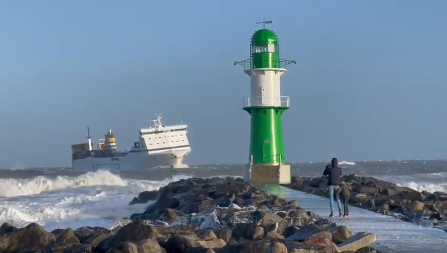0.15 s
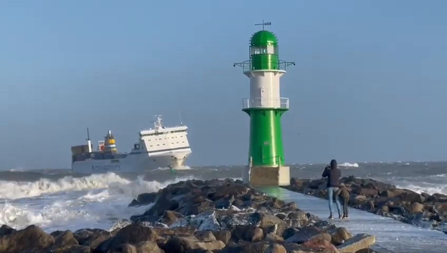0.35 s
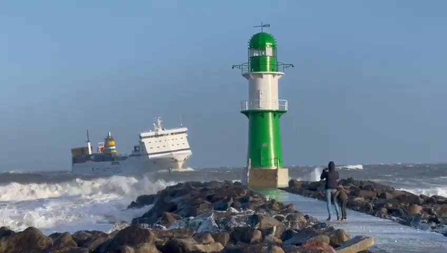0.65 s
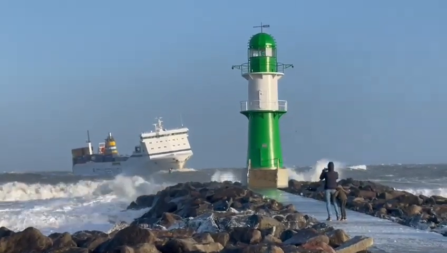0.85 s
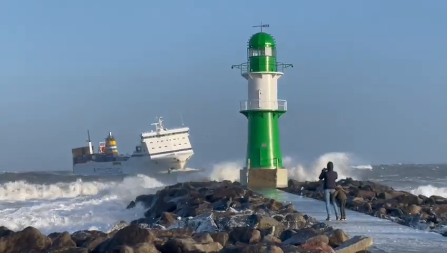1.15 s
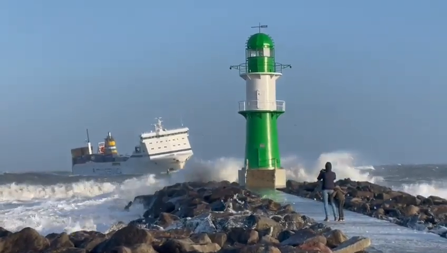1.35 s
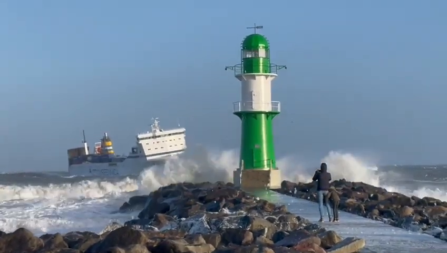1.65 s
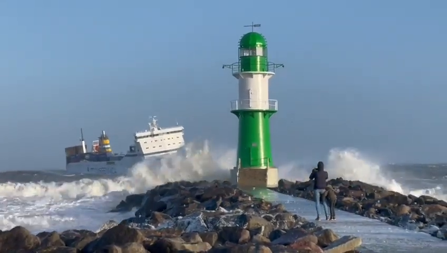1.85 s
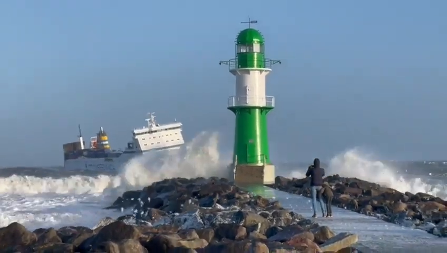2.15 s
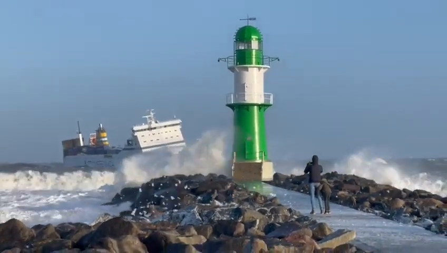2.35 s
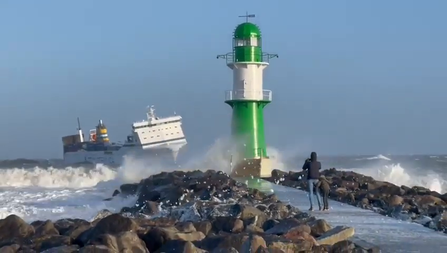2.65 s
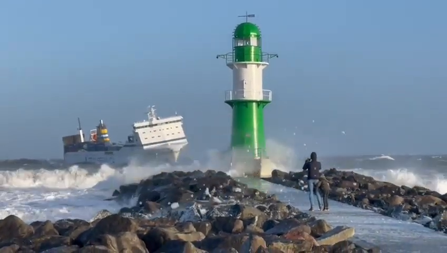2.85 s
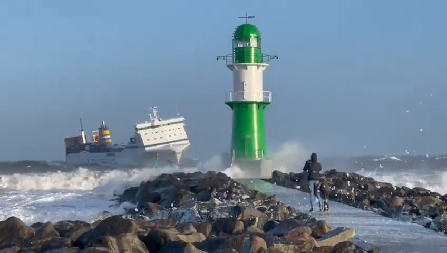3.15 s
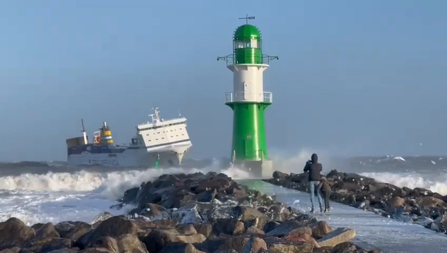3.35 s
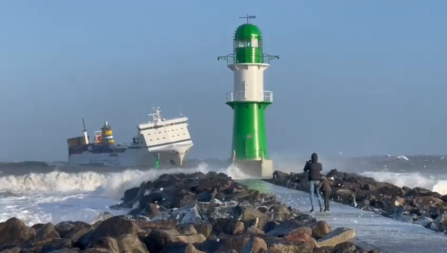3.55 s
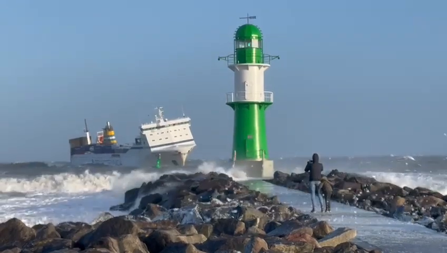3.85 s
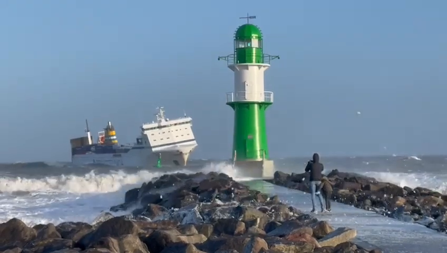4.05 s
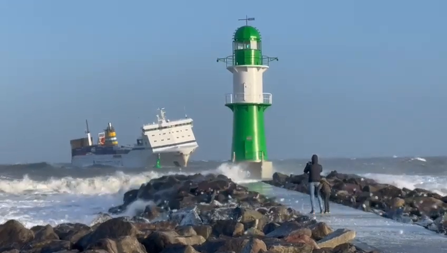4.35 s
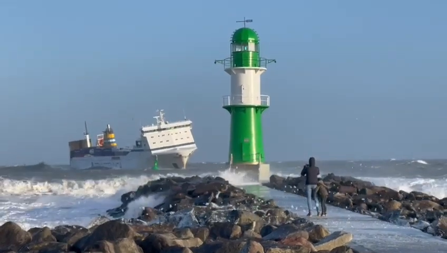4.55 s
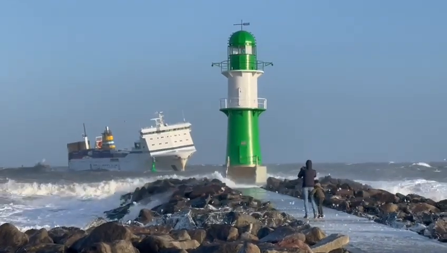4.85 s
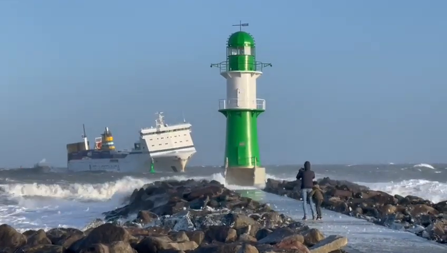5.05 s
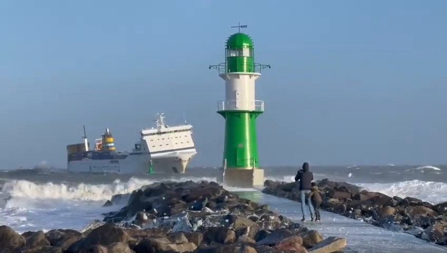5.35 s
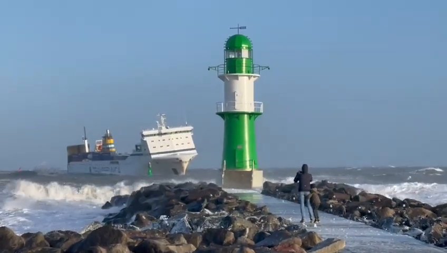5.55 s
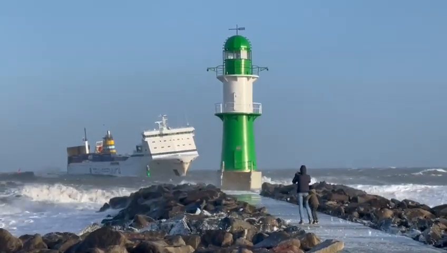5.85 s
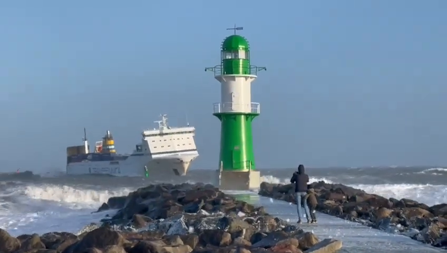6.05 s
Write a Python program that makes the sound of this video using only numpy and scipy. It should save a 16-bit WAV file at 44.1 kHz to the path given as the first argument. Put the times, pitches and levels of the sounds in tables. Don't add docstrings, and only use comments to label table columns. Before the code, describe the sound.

A storm at a rock breakwater, heard through a small handheld stereo microphone without wind protection. From 0 to 1 s moderate wind flutters and rumbles over a steady foamy surf rush, with short puffs of hissing spray and a low shove near 0.7 s. From 1.2 to 2.3 s the wind freshens: thuds and sharp slaps near 1.4 and 1.6 s, while the breaking water swells and its hiss brightens. Around 2.5 to 3 s it eases, then deep buffets hit near 3.1 s, with a thud at 3.3 s and little drops ticking on the case. Gusts peak at 3.7 to 4.1 s with a crack and another bright surf swell. A lull comes around 4.6 to 4.8 s; renewed gusts and a drop splash follow near 4.9 s. From 5.7 to 6 s strong gusts, cracks, a heavy thud and a sharp splash finish over rising surf.

```python
import sys
import numpy as np
from scipy import signal
from scipy.fft import rfft, irfft, next_fast_len
from scipy.io import wavfile
from scipy.ndimage import uniform_filter1d

SR = 44100
rng = np.random.default_rng(int(sys.argv[2]) if len(sys.argv) > 2 else 0)


def master_out(mix):
    frames = np.transpose(np.atleast_2d(mix))
    ceiling = np.clip(frames, -1, 1)
    pcm = np.round(ceiling * 32767).astype(np.int16)
    wavfile.write(sys.argv[1], SR, pcm)


def to_linear_factor(level_db):
    exponent = np.asarray(level_db, float) / 20
    return 10 ** exponent


N = 272979


def in_time(rows):
    return np.interp(np.arange(N) / SR, *np.transpose(rows))


def at_hz(points, hz, axis=1):
    points = np.array(points)
    return np.interp(np.log(hz), np.log(points[:, 0]), points[:, axis])


def rms_one(x):
    return x / np.sqrt(np.mean(x ** 2, axis=-1, keepdims=True) + 1e-20)


def about_mean(db):
    return db - 10 * np.log10(np.mean(to_linear_factor(db) ** 2))


def band_pass(x, low_hz, high_hz):
    return signal.sosfilt(signal.butter(2, [low_hz, high_hz], "band", fs=SR, output="sos"), x)


def drift(rate):
    r = np.exp(-40 * np.pi * rate / SR)
    noise = rng.standard_normal(N // 20 + 2002)
    slow = signal.lfilter([1], [1, -2 * r, r * r], noise)[2000:]
    return np.interp(np.arange(N) / 20, np.arange(len(slow)), rms_one(slow))


def swells(base_db, rows, octaves=0):
    focus = 0.18
    t = np.arange(0, N, 64) / SR
    power = 0
    for s, peak_db, half_s, *tilt in rows:
        db = peak_db + octaves * sum(tilt) - focus * abs(octaves) * max(peak_db, 0)
        power = power + to_linear_factor(db) ** 2 * np.exp(-((t - s) / max(half_s, .008)) ** 2)
    return 10 * np.log10(to_linear_factor(base_db) ** 2 + np.interp(np.arange(N) / SR, t, power))


def grainy(per_s, spread_db, share, channels, flow):
    sizes = -to_linear_factor(spread_db * np.minimum(rng.exponential(1, (channels, N)), 4))
    struck = rng.random((channels, N)) < per_s * to_linear_factor(4.0 * flow) / SR
    pulses = rms_one(sizes * struck)
    brief = signal.sosfilt(signal.butter(2, 140, "high", fs=SR, output="sos"), pulses)
    share = np.clip(share, 0, 1)
    return np.sqrt(1 - share) * rng.standard_normal((2, channels, N)) + np.sqrt(share) * brief


def bursts(rows, decay_s, low_hz, high_hz, offset_db):
    noise = band_pass(rng.standard_normal(N), low_hz, high_hz)
    out = np.zeros(N)
    for s, peak_db in rows:
        part = slice(round(s * SR), round((s + .12) * SR))
        age = np.arange(len(out[part])) / SR / decay_s
        burst = noise[part] * np.sqrt(age) * np.exp(-age)
        out[part] += to_linear_factor(peak_db + offset_db) * burst / np.abs(burst).max()
    return out


# (frequency [Hz], depth [dB])
FLUTTER_DEPTH = [(40, -2.5), (100, -0.3), (250, 3), (600, 3), (2000, 1.5), (5000, 2), (10000, 2)]


def bank(excite, colour, anchors_hz, curves, together, own_db):
    octaves = np.log2(colour[-1][0] / colour[0][0])
    edges = colour[0][0] * 2 ** np.arange(0, octaves, .4)
    out = 0
    for k, (low, high) in enumerate(zip(edges, edges[1:])):
        hz = np.sqrt(low * high)
        band = rms_one(band_pass(excite[k % 2], low, high))
        place = np.interp(np.log(hz), np.log(anchors_hz), np.arange(len(curves)))
        level = sum(max(0, 1 - abs(place - i)) * c for i, c in enumerate(curves))
        shake = rms_one(to_linear_factor(together * at_hz(FLUTTER_DEPTH, hz) + own_db * drift(22)))
        out = out + to_linear_factor(level) * np.sqrt(high - low) * shake * band
    size = next_fast_len(N + 4096)
    gain = to_linear_factor(at_hz(colour, np.fft.rfftfreq(size, 1 / SR) + 1))
    return irfft(rfft(out, size) * gain, size)[:, :N]


# (frequency [Hz], density [dB per Hz])
SURF_SPECTRUM = [(500, -54), (900, -57.5), (1500, -55.5), (2500, -56.5), (4000, -62), (6000, -69),
                 (8000, -73), (10000, -81), (11500, -82), (15000, -88)]
# (time [s], level [dB])
SURF_SWELL = [(0.0, -30.5), (0.6, -31.5), (1.12, -29.5), (1.52, -24.5), (1.85, -24.5), (2.21, -25.5),
              (2.55, -29), (3.2, -28), (3.5, -29.5), (3.86, -24), (4.3, -25), (4.48, -29.5), (4.7, -30.5),
              (4.9, -29), (5.15, -30.5), (5.5, -30.5), (5.84, -26), (6.19, -26)]
# (time [s], level [dB])
HANGING_MIST = [(0.0, -5), (0.48, -17), (0.95, -7.5), (1.43, 2), (1.9, 2.5), (2.38, 0.9), (2.86, -11.5),
                (3.33, -19.2), (3.81, -8), (4.29, 4.5), (4.76, -19.5), (5.24, -2), (5.71, -0.5), (6.19, 3)]
# (time [s], peak level [dB], half length [s])
SPRAY_SHEETS = [(0.27, -10, 0.053), (0.415, -3.5, 0.044), (0.52, -4, 0.0088), (0.588, 0, 0.0086),
                (0.673, -2.5, 0.055), (0.8, -4, 0.031), (0.875, -3, 0.0082), (0.997, -3, 0.011),
                (1.771, 1.5, 0.026), (2.16, 1.0, 0.02), (2.632, 1.2, 0.025), (2.717, 1.5, 0.021),
                (2.798, -0.2, 0.027), (2.952, -1.5, 0.14), (3.238, 1.5, 0.119), (3.554, 4, 0.1),
                (3.722, 3, 0.028), (3.9, 5, 0.14), (4.1, 5.5, 0.057), (4.64, -0.5, 0.46), (4.859, 4, 0.11),
                (5.303, -1.6, 0.068), (5.658, 3, 0.039), (5.942, 4, 0.12)]


def surf(together):
    carried = 0.42
    steady = in_time(STEADY_WIND)
    lift = swells(steady, WIND_GUSTS, 1) - steady
    roar = about_mean(in_time(SURF_SWELL) + carried * lift)
    spray = about_mean(swells(in_time(HANGING_MIST), SPRAY_SHEETS))
    excite = grainy(per_s=500, spread_db=8.5, share=0.36, channels=1, flow=drift(25))
    shaken = rms_one(together + 0.44 * drift(79) + 3.5 * drift(220))
    curves = [roar, spray, 1.87 * spray]
    return bank(excite, SURF_SPECTRUM, [2000, 5000, 9500], curves, shaken, own_db=0.94)[0]


# (time [s], peak level [dB])
SPRAY_DROPS = [(0.583, -22), (0.8669, -25), (1.207, -20), (1.376, -15), (1.482, -16), (2.446, -19),
               (2.788, -24), (2.9048, -17), (2.976, -20), (3.276, -11.5), (3.523, -13), (3.6037, -9.5),
               (3.729, -12), (3.768, -16), (3.872, -21), (4.068, -26), (4.734, -26), (4.9217, -10),
               (5.003, -21), (5.1447, -27), (5.1711, -28), (5.23, -13), (5.5238, -21), (5.901, -17),
               (5.9938, -5.5)]


def drops():
    return bursts(SPRAY_DROPS, decay_s=0.001, low_hz=1500, high_hz=9500, offset_db=-3)


# (time [s], peak level [dB])
AIR_SLAPS = [(0.197, -17), (0.27, -17), (0.398, -19), (0.7, -9), (0.892, -9), (1.385, -2), (1.506, -11),
             (1.634, -4.5), (1.843, -11.5), (3.275, -16), (3.746, -1), (4.919, -12), (5.225, -13.5),
             (5.689, -9), (5.898, -4.5), (5.941, 0)]


def slaps():
    return bursts(AIR_SLAPS, decay_s=0.0011, low_hz=298, high_hz=2800, offset_db=-5.0)


# (time [s], peak level [dB])
STRONG_EDDIES = [(0.195, -6), (0.7, -17.5), (0.892, -7), (0.933, -22), (1.216, 0.5), (1.28, -6), (1.495, 0),
                 (1.632, 2.5), (1.767, -2.5), (1.926, -1), (2.055, 0.5), (2.25, -4.5), (2.413, -1),
                 (2.451, -4), (2.757, -7), (3.16, -4.5), (3.273, 5.5), (4.058, 1), (4.217, -2), (4.302, -2),
                 (4.343, -0.5), (4.583, -7), (4.655, -9), (4.915, -14), (5.226, -2), (5.557, -4),
                 (5.669, -4), (5.795, 0.5), (5.951, 4), (5.995, -5.5)]


def eddies():
    return bursts(STRONG_EDDIES, decay_s=0.0045, low_hz=146, high_hz=980, offset_db=-7.5)


# (frequency [Hz], density [dB per Hz])
WIND_SPECTRUM = [(22, -74), (35, -62), (60, -45.5), (110, -45), (250, -45.5), (450, -48.5), (800, -50),
                 (1200, -59), (2400, -70)]
# (time [s], level [dB])
STEADY_WIND = [
    (0.0, -7.5),
    (0.69, -6.5),
    (1.38, -4),
    (2.06, -1),
    (2.75, -5.8),
    (3.44, -4.5),
    (4.13, 4),
    (4.81, -10),
    (5.5, -7.5),
    (6.19, 4),
]
# (time [s], peak level [dB], half length [s], brightness [dB per octave])
WIND_GUSTS = [(0.207, -4, 0.02, -1), (0.278, -1.8, 0.026, 0.7), (0.408, 1.5, 0.01, 0),
              (0.577, -3.5, 0.0067, -1), (0.699, -3, 0.012, -2), (0.922, -3.0, 0.049, 1),
              (1.28, -3, 0.11, 3), (1.391, 8.5, 0.038, -1.5), (1.488, 5.5, 0.023, 0.5),
              (1.607, 4.5, 0.077, -1), (2.003, 9, 0.043, 0.6), (2.31, 4.5, 0.053, 0.5),
              (2.43, -5, 0.022, 7.5), (2.844, 1, 0.076, 0.7), (3.189, 9, 0.032, 2.5),
              (3.279, 7.5, 0.019, 0.3), (3.458, 0, 0.02, 1.8), (3.657, -4, 0.01, -5),
              (3.749, 9.5, 0.048, 1.3), (3.931, 14, 0.025, -1.7), (4.06, 0.5, 0.15, 3.5),
              (4.385, 6, 0.015, 2), (4.659, 1, 0.02, 1.8), (4.926, 6.5, 0.11, 1.8), (5.058, 7, 0.077, -2),
              (5.314, 0.9, 0.057, 2), (5.685, 8, 0.013, 2), (5.707, 2.1, 0.12, 0.5),
              (5.883, 12.5, 0.023, 1.5), (6.008, 10, 0.069, -.2)]
# (time [s], peak level [dB], half length [s])
AIR_SHOVES = [(0.416, -0.5, 0.065), (0.666, 6.5, 0.075), (1.213, -9, 0.07), (1.408, 0.5, 0.067),
              (1.648, 4, 0.068), (1.835, 5.5, 0.044), (2.033, 3, 0.073), (2.301, 3.6, 0.041),
              (2.429, 3, 0.022), (2.772, 2, 0.1), (3.013, 11, 0.028), (3.094, 15, 0.017),
              (3.177, -5, 0.019), (3.309, 6, 0.071), (3.54, 13, 0.021), (3.645, 5, 0.053),
              (3.747, 12, 0.028), (3.928, 1.5, 0.28), (4.688, 5.5, 0.044), (5.016, 4, 0.12),
              (5.242, 4.5, 0.042), (5.68, 3, 0.022), (5.84, 5.5, 0.03), (6.026, 3, 0.049)]
CALM_LEVELS = [
    -4.7,
    -1.6,
    1,
]


def wind(together):
    excite = grainy(per_s=300, spread_db=3.0, share=0.41, channels=2, flow=together)
    steady = in_time(STEADY_WIND)
    rumble = swells(-3 + 0.36 * (steady - steady.mean()), AIR_SHOVES)
    gusty = [swells(steady + db, WIND_GUSTS, octave) for db, octave in zip(CALM_LEVELS, [-1, 0, 1])]
    curves = [about_mean(c) for c in [rumble] + gusty]
    return bank(excite, WIND_SPECTRUM, [65, 185, 410, 850], curves, together, own_db=0.64)


# (frequency [Hz], phase, left lags if < 0 [rad], left-right level [dB])
PORT_DIFFERENCE = [(150, -.36, 0), (330, -.26, .3), (650, -.42, 1.6), (1050, -.2, 2.8), (1500, -.02, 1.3),
                   (2100, 0, 0), (3000, .36, 0), (4600, .17, 0), (5350, .25, 0), (5800, -1.55, 0),
                   (6700, -.55, 0), (7450, -2.0, 0), (9100, -3.14, 0), (11600, -5.0, 0)]
# (frequency [Hz], level re the common part [dB])
LOCAL_WIND = [(40, -13), (150, -11.2), (330, -14), (650, -5.5), (1050, -4), (1400, -6), (2000, -12)]


def two_ports(common, local):
    size = next_fast_len(N + 4096)
    hz = np.maximum(np.fft.rfftfreq(size, 1 / SR), 1)
    phase = at_hz(PORT_DIFFERENCE, hz, axis=1)
    level_db = at_hz(PORT_DIFFERENCE, hz, axis=2)
    half = np.exp(.5j * phase) * to_linear_factor(.5 * level_db)
    both = rfft(common, size)
    apart = rfft(local, size) * to_linear_factor(at_hz(LOCAL_WIND, hz))
    return irfft(np.array([both * half + apart, both / half - apart]), size)[:, :N]


# (frequency [Hz], sum depth [dB], difference depth [dB])
LINE_DEPTH = [(300, 30, 24), (1400, 24, 15), (3000, 22, 14), (5800, 18, 11), (6700, 14, 4), (7300, 11, 14),
              (7700, 3, 16), (9000, 0, 14), (10300, -1, 10), (11500, 1, 2.5)]
FULL_MOMENTS = [
    .15,
    .48,
    .59,
    1.42,
    1.65,
    3.72,
    5.03,
    5.15,
]


def joint_stereo(x):
    sum_and_difference = [x[0] + x[1], x[0] - x[1]]
    padded = np.pad(sum_and_difference, [(0, 0), (0, 4096)], "reflect") / 2
    hz, t, pair = signal.stft(padded, SR, nperseg=2048, boundary="even")
    power = np.abs(pair) ** 2
    both = uniform_filter1d(power.sum(axis=0), size=21, axis=0)
    waver = rng.standard_normal((2, len(hz) // 10 + 1, len(t)))
    waver = np.repeat(waver, 10, axis=1)[:, :len(hz)]
    waver = waver + (hz[:, None] > 9300) * rng.standard_normal(len(t)) * 0.8
    depth = np.array([at_hz(LINE_DEPTH, np.maximum(hz, 1), axis=k)[:, None] for k in (1, 2)])
    limit = both * to_linear_factor(5.6 * waver - depth) ** 2
    limit[:, :, np.searchsorted(t, FULL_MOMENTS)] *= to_linear_factor(-60)
    lost = uniform_filter1d(power, size=5, axis=1) < limit
    mid, side = signal.istft(pair * ~lost, SR, nperseg=2048)[1][:, :N]
    return np.array([mid + side, mid - side])


def scene():
    together = rms_one(drift(45) + 0.99 * drift(130))
    common, local = wind(together)
    return two_ports(common + eddies() + surf(together) + drops() + slaps(), local)


def roll_off(x):
    return signal.sosfilt(signal.butter(12, 12900, fs=SR, output="sos"), x)


def record(dry):
    rounded = 1.12 * np.tanh(dry / 1.12)
    cut = signal.sosfilt(signal.cheby2(16, 60, 12100, fs=SR, output="sos"), rounded)
    mix = joint_stereo(cut)
    return roll_off(mix)


dry = scene()
out = record(dry)
master_out(out)
```